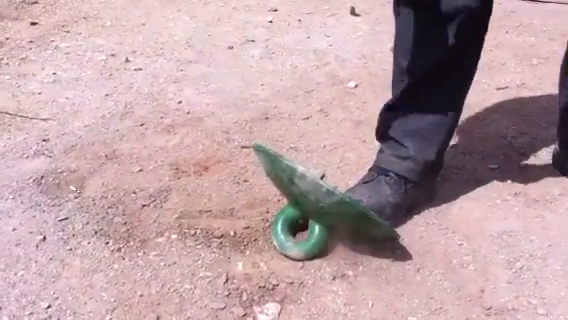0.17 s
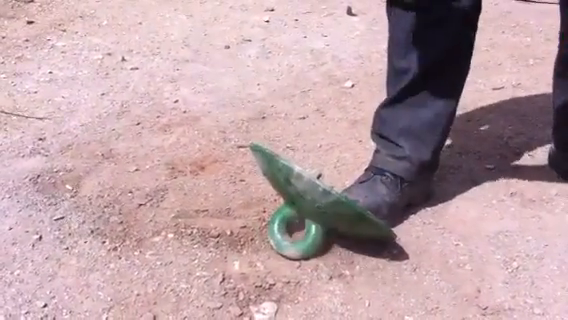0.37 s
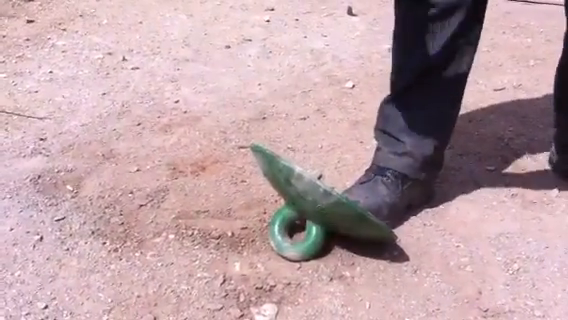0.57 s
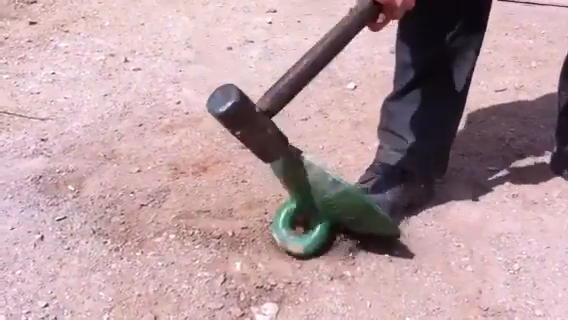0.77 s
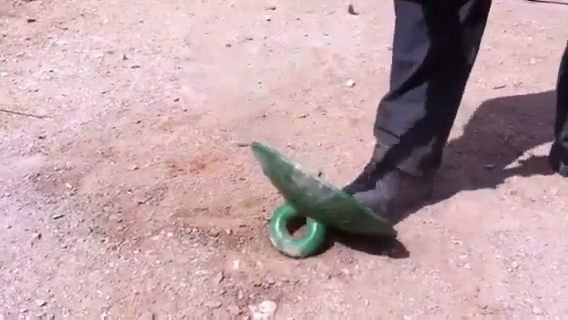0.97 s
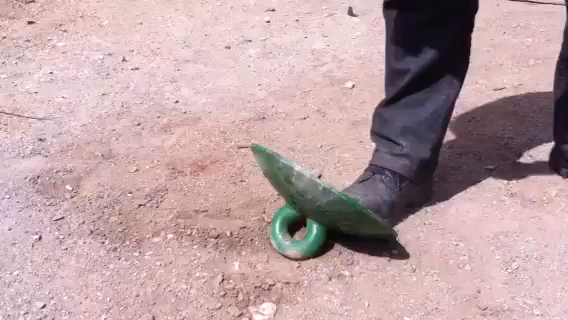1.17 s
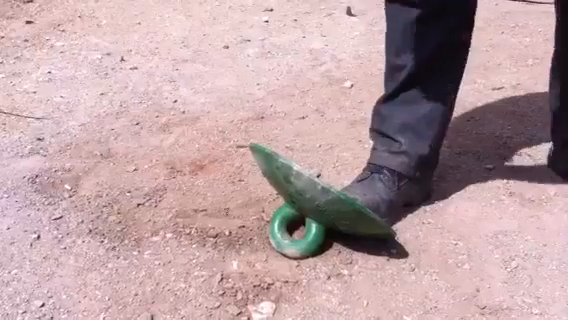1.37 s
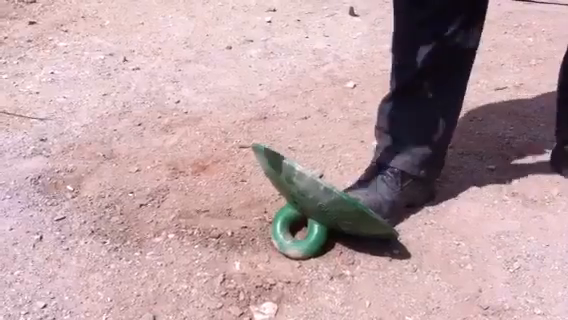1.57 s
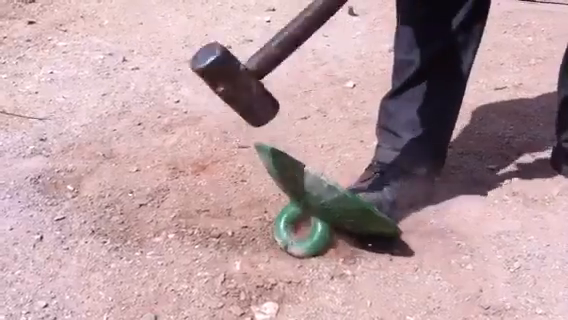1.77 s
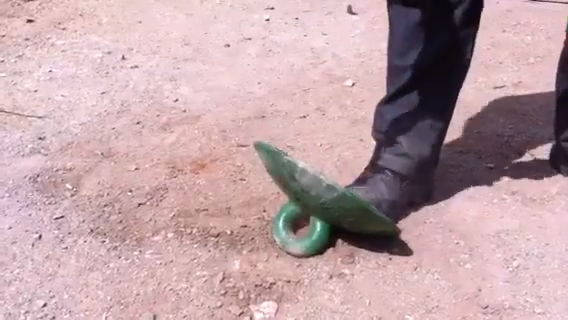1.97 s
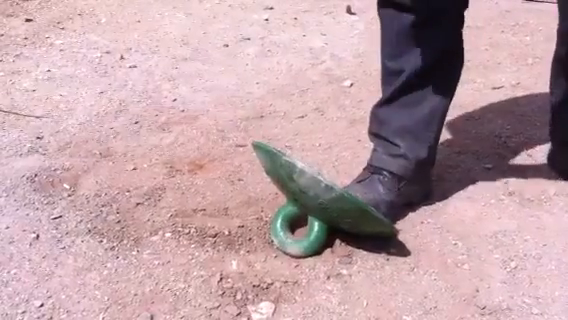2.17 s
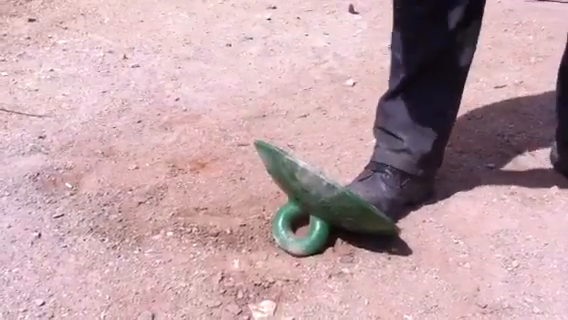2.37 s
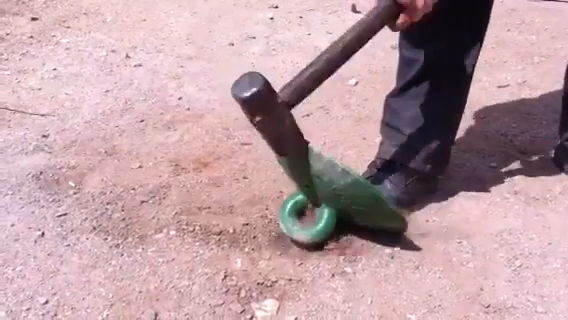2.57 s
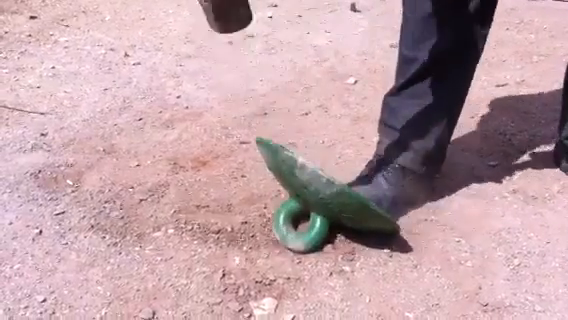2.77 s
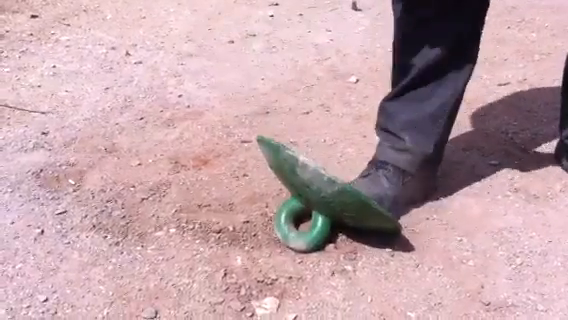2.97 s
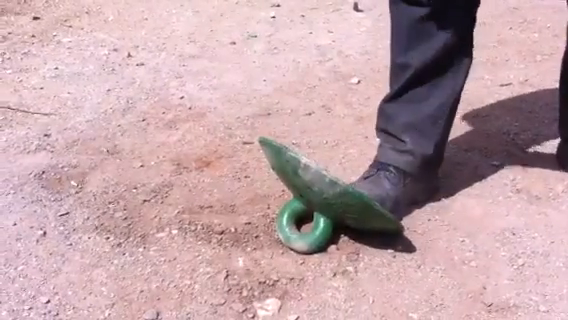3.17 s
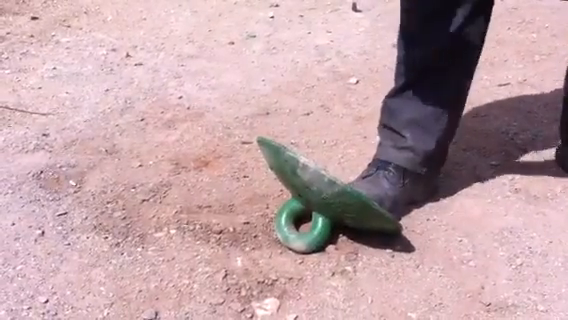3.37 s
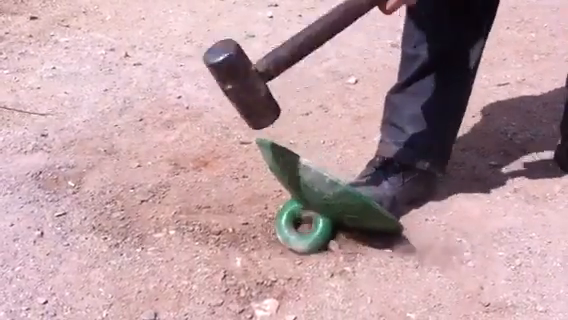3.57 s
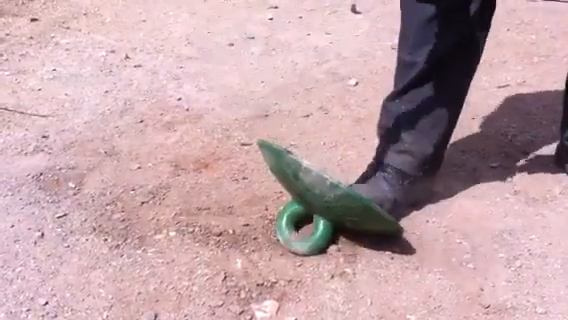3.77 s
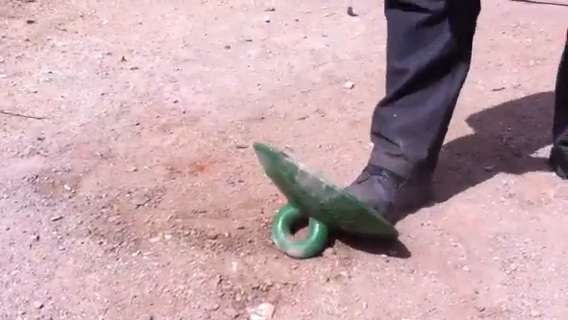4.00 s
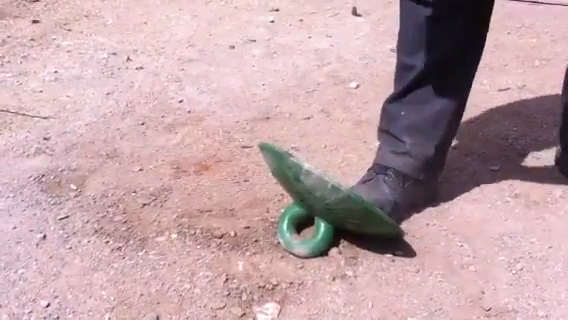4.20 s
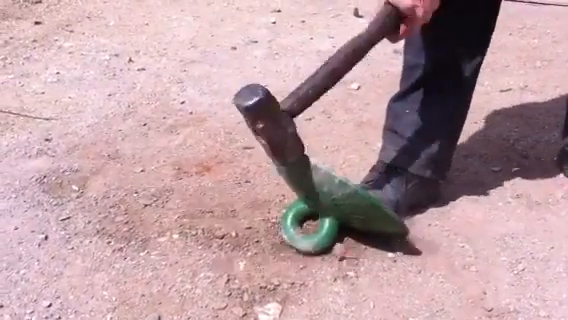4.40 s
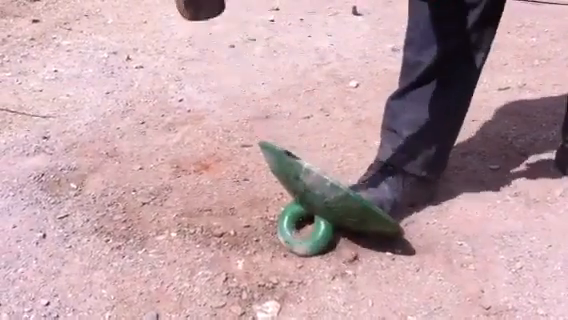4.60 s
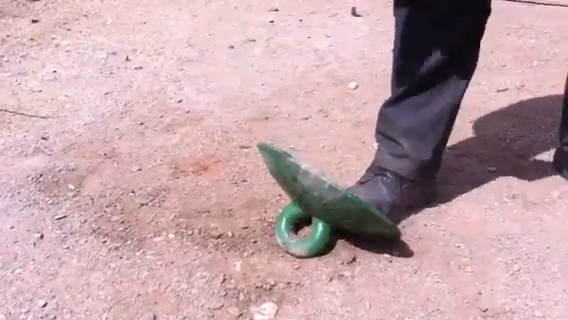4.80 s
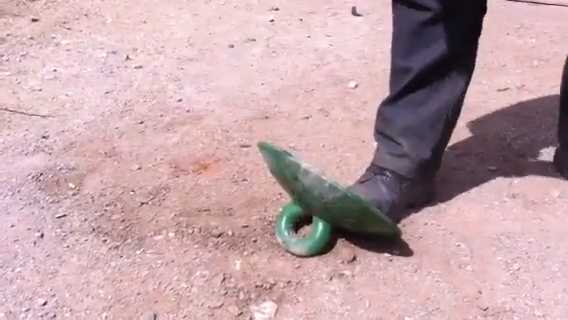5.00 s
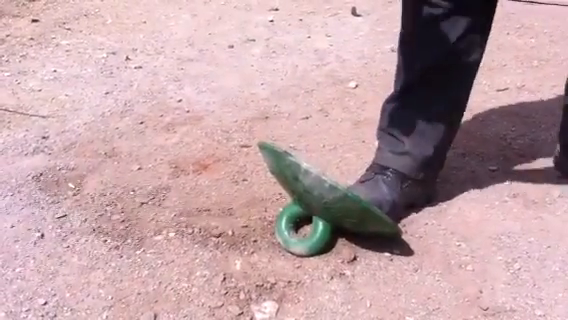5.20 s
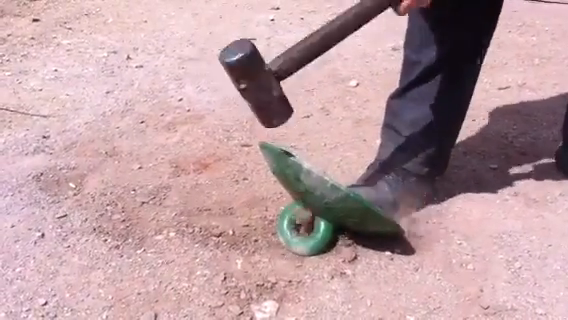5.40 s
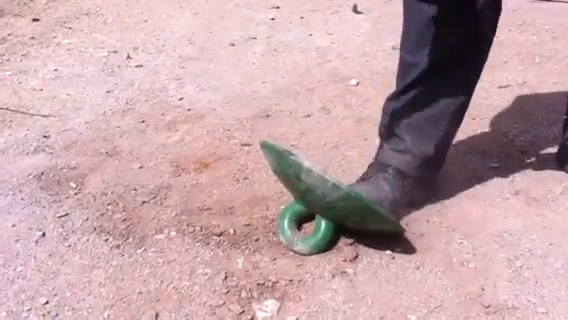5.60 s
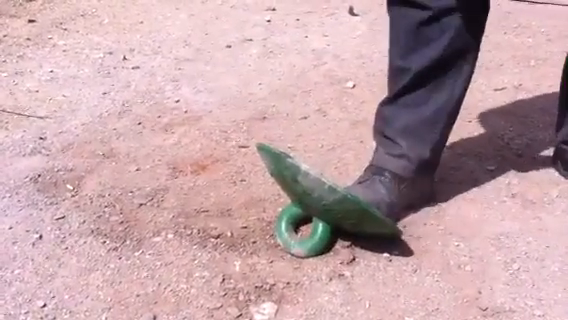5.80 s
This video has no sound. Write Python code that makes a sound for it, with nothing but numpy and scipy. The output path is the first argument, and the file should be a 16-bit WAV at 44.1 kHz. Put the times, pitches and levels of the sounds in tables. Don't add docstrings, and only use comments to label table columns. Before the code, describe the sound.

A ringing blow is already fading at the start, then a sledgehammer hits a steel disc six more times, roughly once a second. Each clang is sharp, bright and slightly overloaded, ringing briefly with scattered yard echoes. Between blows there is a soft distant hum, faint leaf hiss and a far bird whistle. Close outdoor microphone, with wind puffs near the end.

```python
import sys
import numpy as np
from scipy import signal
from scipy.fft import rfft, irfft, next_fast_len
from scipy.io import wavfile
from scipy.ndimage import uniform_filter1d, map_coordinates

SR = 44100
rng = np.random.default_rng(int(sys.argv[2]) if len(sys.argv) > 2 else 0)


def voltage_ratio(decibels):
    exponent = np.asarray(decibels, float) / 20
    return 10 ** exponent


def store_pcm(level_fs):
    pcm = np.round(np.clip(level_fs, -1, 1) * 32767).astype(np.int16)
    wavfile.write(sys.argv[1], SR, np.atleast_2d(pcm).T)


N = 257984


def unit(x):
    return x / np.sqrt(np.mean(x ** 2) + 1e-20)


def along(points, hz):
    f, v = np.transpose(points)
    return np.interp(np.log(hz + 1), np.log(f + 1), v)


def curves(rows, t):
    s, *columns = np.transpose(rows)
    return [np.interp(t, s, column) for column in columns]


def wobble(rate, size=N):
    knots = rng.standard_normal(int(size * rate / SR) + 4)
    return map_coordinates(knots, [np.arange(size) * rate / SR])


def add(track, sound, s):
    i = round(s * SR)
    part = sound[max(-i, 0):][:N - max(i, 0)]
    track[max(i, 0):][:len(part)] += part


def noise(spectrum):
    m = next_fast_len(N)
    colour = voltage_ratio(along(spectrum, np.fft.rfftfreq(m, 1 / SR)))
    return unit(irfft(rfft(rng.standard_normal(m)) * colour, m)[:N])


def dying(spectrum, t60s, lumpy_db=0):
    hz, t, z = signal.stft(rng.standard_normal(SR), SR, nperseg=256)
    colour = unit(voltage_ratio(along(spectrum, hz) + lumpy_db * rng.standard_normal(len(hz))))[:, None]
    decay = voltage_ratio(-60 * t / along(t60s, hz)[:, None])
    return signal.istft(z * colour * decay, SR, nperseg=256)[1][:SR]


def ring(hz, db, t60, t, flutter_db=0):
    onset = np.minimum(np.arange(len(t)) / SR / 0.043, 1)
    flutter = flutter_db * wobble(35, size=len(t)) * onset
    return voltage_ratio(db - 60 * t / t60 + flutter) * np.sin(2 * np.pi * (hz * t + rng.random()))


# hz, level_db per Hz
HUM_SPECTRUM = [(180, -39.5), (300, -6.5), (359, -8.5), (684, -8.5), (753, -12), (900, -8.5), (978, -12.5),
                (1720, -10), (2560, -18.5), (3510, -24), (4310, -18.5), (8000, -35), (10400, -65),
                (17600, -120)]
# after_blow_s, level_db
HUM_SWELL = [(0, 3.5), (.16, 9.5), (.42, 0.5), (.92, 4)]


def hum():
    t = np.arange(N) / SR
    starts = np.array([blow[0] for blow in BLOWS])
    since_blow = t - starts[np.searchsorted(starts, t) - 1]
    level_db = -59.5 + curves(HUM_SWELL, since_blow)[0] + 0.33 * wobble(29)
    return voltage_ratio(level_db) * noise(HUM_SPECTRUM)


# hz, level_db per Hz
WIND_SPECTRUM = [(15, -60), (25, -34.5), (86, -13), (125, 2), (230, -2.5), (263, -4), (539, -24),
                 (600, -22.5), (780, -51.5), (1320, -120)]
# time_s, level_db
GUST = [(0, -64.5), (.3, -64.5), (1.25, -68), (1.73, -63), (2.15, -64), (4.1, -66), (4.6, -57.5),
        (4.95, -69.5), (5.36, -48.5), (5.55, -58.5), (5.85, -56.5)]


def wind():
    lumpy = unit(voltage_ratio(0.77 * wobble(16)) * noise(WIND_SPECTRUM))
    return voltage_ratio(curves(GUST, np.arange(N) / SR)[0] + 5.0) * lumpy


# hz, level_db per Hz
LEAF_SPECTRUM = [(1760, -40.5), (3000, -21), (3930, 2), (5270, -7.5), (6810, 0.5), (8200, -14), (8930, -6),
                 (15100, -15.5), (16200, -27), (16500, -52.5)]
# start_s, length_s, level_db
RUSTLE = [
    (-.1, 0.08, -49),
    (1.5, 0.55, -66.5),
    (2.406, 0.69, -60),
    (4.04, 0.7, -60.5),
    (5.5, .4, -62.5),
]


def leaves():
    rise_s, settle_s, still_db = 0.0068, .12, -70
    t = np.arange(N) / SR
    stir = np.zeros(N)
    for s, length, db in RUSTLE:
        settling = np.exp(-np.maximum(t - s - length, 0) / settle_s)
        stir += voltage_ratio(db) * np.clip((t - s) / rise_s, 0, 1) * settling
    return np.maximum(stir, voltage_ratio(still_db)) * voltage_ratio(.8 * wobble(31)) * noise(LEAF_SPECTRUM)


# start_s, length_s, level_db, warble_hz, aside_db
BIRD = [
    (.7, .1, -66, 60, -90),
    (1.55, .08, -65, 100, -90),
    (1.625, .085, -55, 110, -58),
    (1.69, .05, -60, 350, -66),
    (3.474, .115, -57, 330, -60),
    (4.3, .1, -65, 60, -90),
]


def bird():
    song_hz, warble_rate_hz, aside_s = 4200, 30, .03
    out = np.zeros(N)

    def whistle(hz, db):
        return voltage_ratio(db + 4.5) * np.hanning(len(hz)) ** .5 * np.sin(2 * np.pi * np.cumsum(hz) / SR)

    for s, length, db, depth_hz, aside_db in BIRD:
        t = np.arange(round(length * SR)) / SR
        add(out, whistle(song_hz - depth_hz * np.cos(2 * np.pi * warble_rate_hz * t), db), s)
        add(out, whistle(np.linspace(3150, 3750, round(aside_s * SR)), aside_db), s + length / 2)
    out = out * (.8 + .4 * wobble(150))
    blur = dying([(4000, 0)], [(4000, 0.14)])
    return .8 * out + .6 * signal.fftconvolve(out, blur / np.linalg.norm(blur))[:N]


# start_s, peak_db, pitch_hz
THUMPS = [
    (3.452, -36, 185),
    (4.372, -38, 194),
    (5.022, -29.5, 163),
    (5.112, -41, 219),
    (5.159, -39.5, 161.6),
    (5.291, -41, 182),
    (5.342, -35.5, 124.4),
    (5.389, -32.5, 198.5),
    (5.639, -31, 220),
    (5.819, -35, 196),
]


def thumps():
    t = np.arange(SR // 10) / SR
    out = np.zeros(N)
    settling = [(blow[0] + 0.095, -36.5, 163) for blow in BLOWS[:4]]
    for s, db, hz in THUMPS + settling:
        envelope = (t / 0.014) * np.exp(-t / 0.0052)
        add(out, voltage_ratio(db + 12.5) * envelope * np.sin(2 * np.pi * hz * t), s - .004)
    return out


# hz, t60_s
YARD_T60 = [(150, 0.21), (700, 0.77), (2000, 1), (4500, 0.12), (9000, 0.15), (16000, 0.51)]
# hz, level_db
YARD_COLOUR = [(100, -9.5), (500, -5), (2500, -5.5), (3300, 0), (4500, 1), (9000, 21.5), (16000, -10)]
# delay_s, rise_s, level_db
FAR_WALL = (0.18, 0.22, -34.5)


def yard():
    t = np.arange(SR) / SR
    delay, rise, far_db = FAR_WALL
    near, far = dying(YARD_COLOUR, YARD_T60), dying(YARD_COLOUR, YARD_T60)
    far = far * np.clip((t - delay + rise) / rise, 0, 1) ** 2
    return voltage_ratio(-24.5) * near / np.linalg.norm(near) + voltage_ratio(far_db + 1.5) * far / np.linalg.norm(far)


# pitch_hz, t60_s
HEAD_MODES = [(8650, 7.8), (13385, .45)]
# after_blow_s, direct_speed_m/s, ground_speed_m/s, ground_db
SWING = [
    (0, 0, -.2, -3),
    (.15, 1.2, -.4, 0),
    (.33, 3.4, .4, -2),
    (.43, 4.4, 2, -20),
    (.6, 1.6, 1.6, -40),
    (.8, -2.6, 0, -40),
    (.92, -6, 0, -40),
]
# after_blow_s, level_db
FACING = [(0, -4), (.1, -2), (.3, 0), (.37, -3), (.42, -13), (.47, -2), (.75, -5), (.83, -12), (.88, -30)]


def hammer(ring_db):
    t = np.arange(SR) / SR
    away, away_ground, ground_db = curves(SWING, t)

    def heard(speed):
        return np.cumsum(1 - speed / 343) / SR

    def tone(u):
        return sum(ring(hz, db, t60, u, flutter_db=1.8) for (hz, t60), db in zip(HEAD_MODES, ring_db))

    both_paths = tone(heard(away)) + voltage_ratio(ground_db) * tone(heard(away_ground))
    return voltage_ratio(curves(FACING, t)[0]) * both_paths


MODE_HZ = [712, 1227, 2502, 4266, 4473, 4761, 5160, 5465, 6678, 6856, 10350, 14158, 1935, 2066, 2545, 2767,
           3700, 5418, 3870, 5900, 8296, 8485, 8765, 9138]
# antinode_db, pattern_phase_degrees
MODE_SHAPE = [(-22, 170), (-9, 160.7), (-11.5, 167), (-12, 126), (-17, 126), (-21, 131), (-19.5, 110),
              (-18, 126), (-11, 156), (-25, 43), (-32.5, 132), (-25, 150), (-25.5, 144), (-31, 126),
              (-21.5, 100), (-23, 145), (-28.5, 170), (-24.5, 162), (-35.5, 42), (-41, 210), (-37.5, 34),
              (-34, 96), (-36, 250), (-34, 200)]
DIAMETERS = [6, 6, 6, 6, 7, 7, 6, 3, 4, 7, 7, 5, 4, 5, 6, 4, 6, 4, 7, 7, 6, 2, 4, 3]


def drive(place, hardness):
    node_leak = 0.064
    top_db, phase = np.transpose(MODE_SHAPE)
    reach = np.abs(np.cos(np.radians(np.array(DIAMETERS) * place + phase))) + node_leak
    return top_db + 20 * np.log10(reach) + hardness * np.log2(np.array(MODE_HZ) / 3000)


MODE_T60 = [0.28, 0.19, 0.27, 0.37, 0.35, 0.29, 0.26, 0.26, 0.12, 0.27, 0.24, 0.3, 0.5, 0.5, 0.2, 0.4, 0.46,
            0.34, 0.46, 0.51, 0.39, 0.29, 0.36, 0.28]
TWIN_DB = [-28, -29, -18, -30, -30, -17, -30, -24, -26, -26, -28, -36, -15, -15, -18, -19, -24, -26, -20,
           -32, -22, -28, -26, -26]
BODY_HZ = [9815, 10840, 15115, 12000, 12450, 15620]
# level_db, t60_s
BODY = [(-55.5, 0.71), (-46, 0.13), (-34.5, .14), (-32.5, .17), (-36, .16), (-44.5, 0.2)]
# hz, level_db per Hz
CRASH = [(35, -46), (60, -21), (414, -5.5), (712, -5), (1220, -3.5), (1590, -6.5), (2720, -2),
         (3210, -17.5), (4680, 1.5), (6210, -19.5), (6830, -7), (14500, -34.5), (16700, -32)]
# hz, t60_s
CRASH_T60 = [(100, 0.12), (500, 0.17), (1500, 0.28), (4000, 0.14), (9000, 0.046), (16000, .045)]
# hz, level_db per Hz
SHIMMER = [(240, -51), (400, -22.5), (1220, -14), (2100, -9.5), (2510, -5), (3310, -28.5), (4380, -10),
           (6240, -20), (6740, -23.5), (14600, -25.5), (16000, -35)]
# hz, t60_s
SHIMMER_T60 = [(500, 0.43), (2000, 0.067), (5000, 0.38), (9000, 0.19), (15000, 0.13)]


def disc(blow, thud_db, knock_db):
    _, crash_db, place, hardness, _ = blow
    t = np.arange(SR) / SR
    t60s = 0.89 * np.array(MODE_T60)
    rim, twins, body = np.zeros(SR), np.zeros(SR), np.zeros(SR)
    for hz, t60, db, twin_db in zip(MODE_HZ, t60s, drive(place, hardness), TWIN_DB):
        rim += ring(hz, db, t60, t, flutter_db=1.8)
        twins += ring(hz + 4, db + twin_db, 2.69 * t60, t) * (0.9 + 0.8 * wobble(60, size=SR))
    for hz, (db, t60) in zip(BODY_HZ, BODY):
        body += ring(hz, db + 1.8 * hardness + rng.normal(0, 2.7), t60, t, flutter_db=-1.5)
    contact = 1 + 15.9 * voltage_ratio(-60 * t / 0.019)
    crash = voltage_ratio(crash_db) * contact * 0.31 * dying(CRASH, CRASH_T60, lumpy_db=3.5)
    shimmer = voltage_ratio(-24 + hardness) * dying(SHIMMER, SHIMMER_T60)
    thud = ring(195, thud_db, 0.068, t) + ring(445, knock_db, 0.05, t)
    return (rim + twins + body + crash + shimmer + thud) * (1 - np.exp(-t / .0008))


# start_s, crash_db, rim_place_degrees, hardness_db per octave, hush_before_s
BLOWS = [
    (-.08, 0.5, -4.5, 3.5, .005),
    (0.8409, -3, 27, 3, 0.0087),
    (1.7599, -3.5, -18, 1.6, 0.018),
    (2.6852, -4, 38, 0.5, 0.018),
    (3.6181, -5.5, -10, -2.5, 0.021),
    (4.5335, -2, 2.5, 2.6, 0.0073),
    (5.4552, -0.5, 22.5, 1.7, 0.0033),
]
# thud_db, hollow_knock_db, hammer_ring_db, upper_head_mode_db
KNOCK = [(-37, -30.5, -64, -41.5), (-18.5, -8, -73, -53.5), (-13, -53.5, -72, -67),
         (-16, -33, -53.5, -39.5), (-15, -24, -54, -41.5), (-25, -30.5, -55, -36), (-21.5, -34, -52.5, -38)]


def blows():
    out = np.zeros(N)
    for blow, (thud_db, knock_db, *ring_db) in zip(BLOWS, KNOCK):
        clang = disc(blow, thud_db, knock_db)
        add(out, clang, blow[0])
        add(out, signal.fftconvolve(clang, yard()), blow[0] + 0.014)
        add(out, hammer(ring_db)[:round(.915 * SR)], blow[0])
    return out


def scene():
    return (hum() + wind() + leaves() + bird() + thumps() + blows())[None]


def masked(x, near_db, under_db, quiet_db, from_hz):
    hz, _, z = signal.stft(x, SR, nperseg=1024)
    power = np.abs(z) ** 2
    patch = uniform_filter1d(uniform_filter1d(power, size=4, axis=0), size=3, axis=1)
    beside = uniform_filter1d(power, size=28, axis=0) * voltage_ratio(2 * near_db)
    falling = voltage_ratio(-2 * 9 * np.log2(np.maximum(hz, 1) / from_hz))[:, None]
    under = np.maximum(power.sum(0) * voltage_ratio(2 * under_db), voltage_ratio(2 * quiet_db))
    limit = np.maximum(beside, falling * under)
    kept = (patch > limit) | (hz[:, None] < from_hz)
    return signal.istft(z * kept, SR, nperseg=1024)[1][:N]


def roll_off(x):
    return signal.sosfilt(signal.butter(12, 16860, fs=SR, output="sos"), x)


def record(dry):
    wet = dry / (1 + np.abs(dry / 0.5) ** 5) ** (1 / 5)
    t, hush, burst = np.arange(N) / SR, np.ones(N), np.zeros(N)
    for s, *_, gap in BLOWS:
        hush *= np.clip(np.maximum(s - gap - t, t - s + 0.00041) / 0.0017, 0, 1)
        burst += (t > s - .0042) * (t < s) * voltage_ratio(-32 + 1200 * np.minimum(t - s, 0))
    wet = masked(wet[0], near_db=-10, under_db=-46, quiet_db=-101, from_hz=7300)[None]
    last_s, early_s = BLOWS[-1][0], .03
    swell = np.clip((t - last_s + early_s) / early_s, 0, 1) ** .5 * (t < last_s)
    lead_in = voltage_ratio(-30) * swell * np.roll(wet, -round(early_s * SR + 400), axis=1)
    wet = wet * hush + burst * noise(CRASH) + lead_in
    wet = signal.sosfilt(signal.butter(1, 90, "high", fs=SR, output="sos"), wet)
    wet = signal.sosfiltfilt(signal.cheby2(12, 70, 17100, fs=SR, output="sos"), wet)
    return roll_off(wet)


dry = scene()
out = record(dry)
store_pcm(out)
```